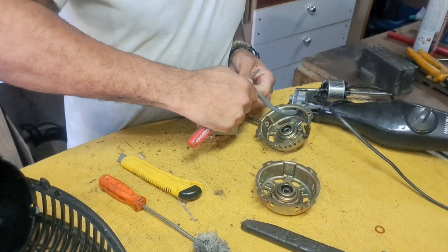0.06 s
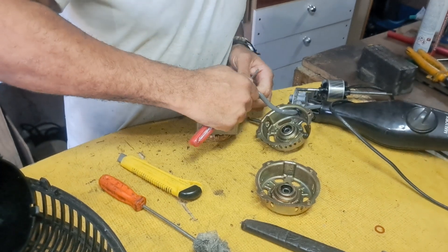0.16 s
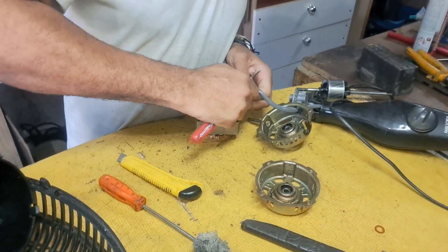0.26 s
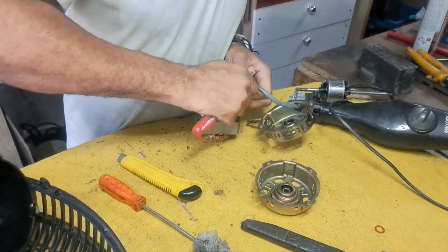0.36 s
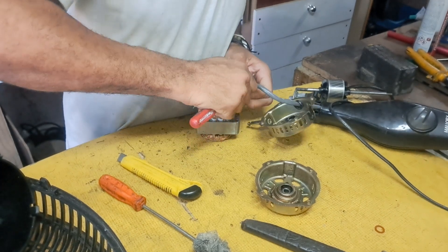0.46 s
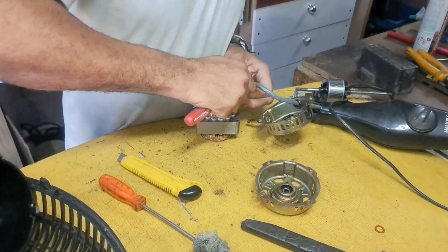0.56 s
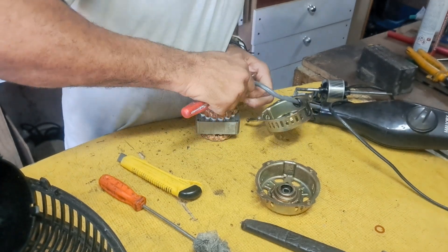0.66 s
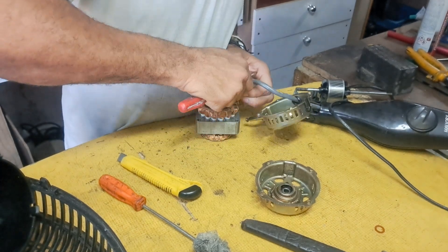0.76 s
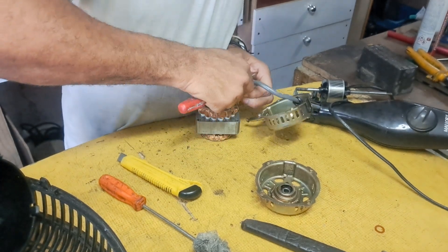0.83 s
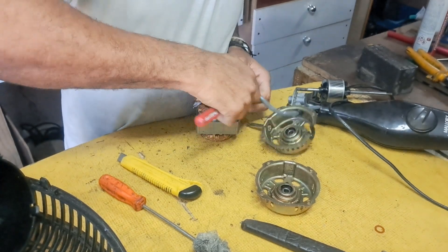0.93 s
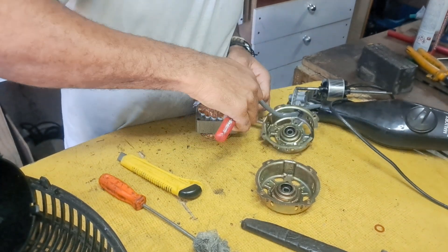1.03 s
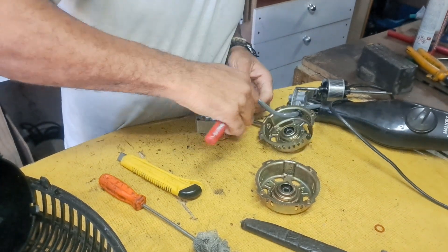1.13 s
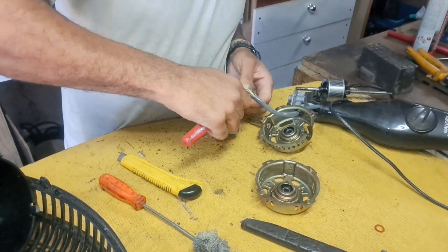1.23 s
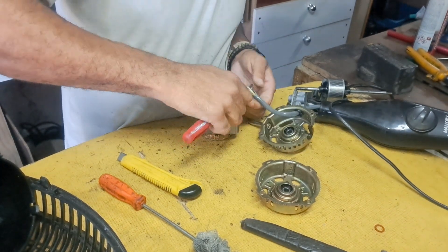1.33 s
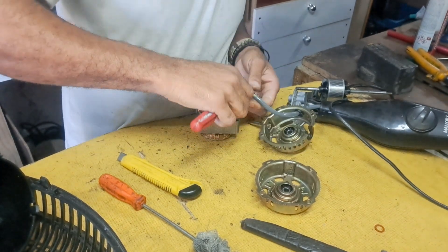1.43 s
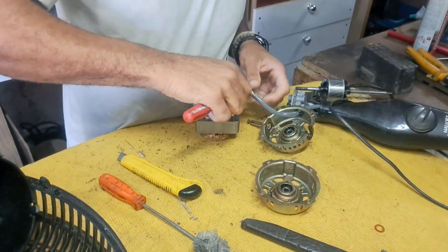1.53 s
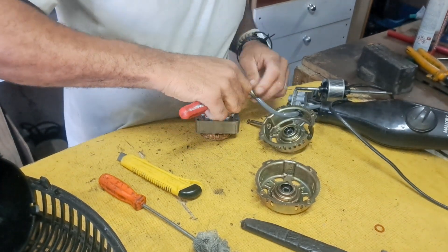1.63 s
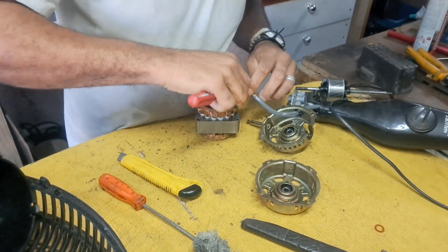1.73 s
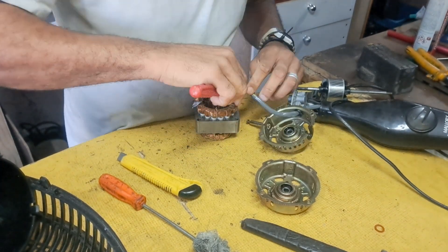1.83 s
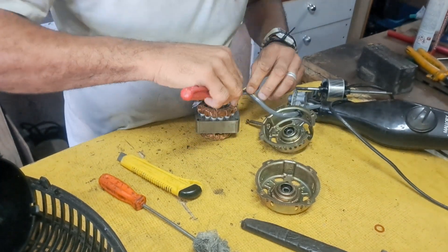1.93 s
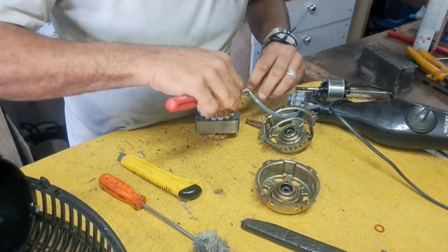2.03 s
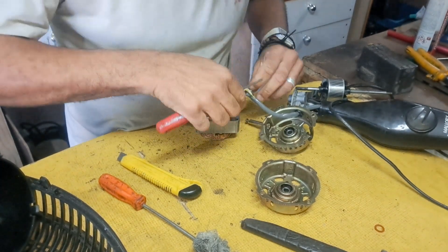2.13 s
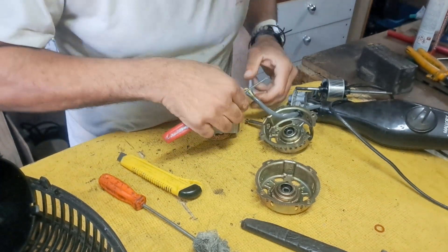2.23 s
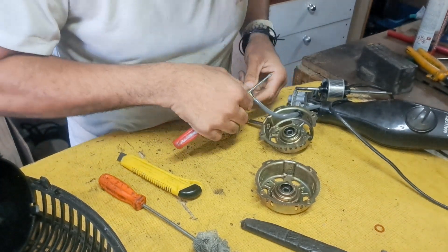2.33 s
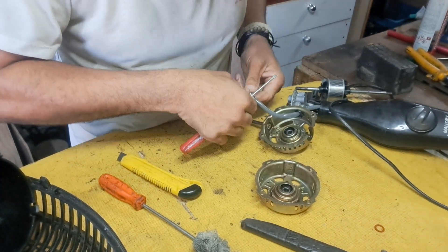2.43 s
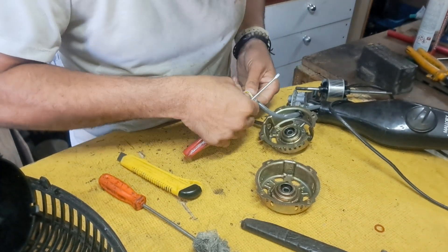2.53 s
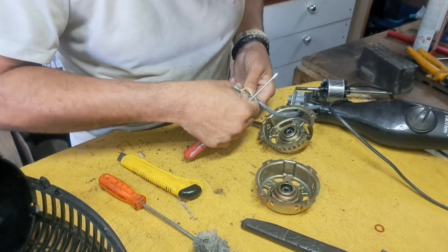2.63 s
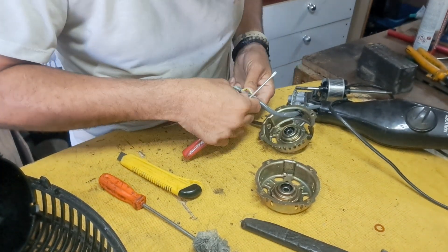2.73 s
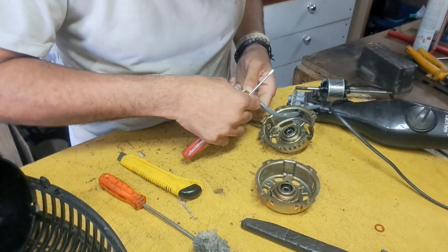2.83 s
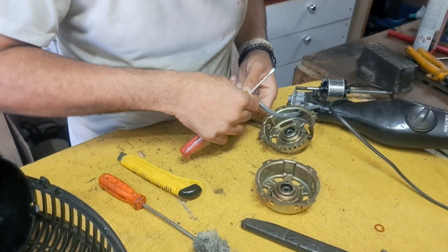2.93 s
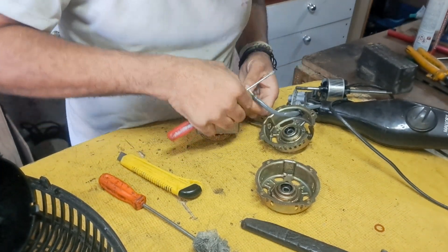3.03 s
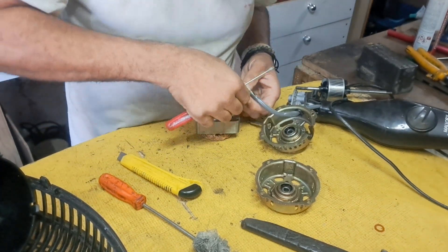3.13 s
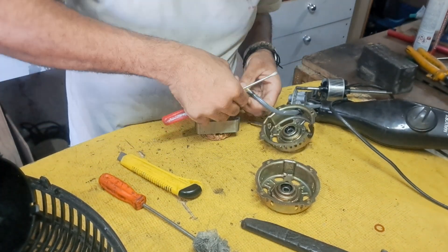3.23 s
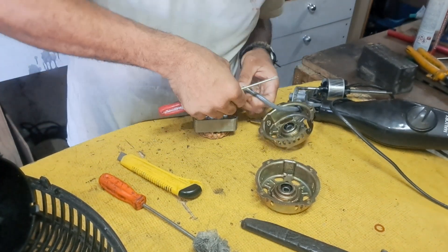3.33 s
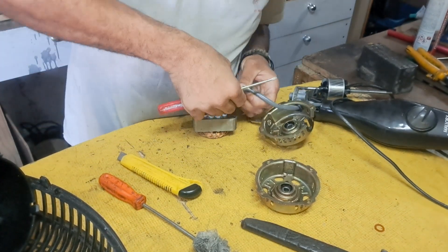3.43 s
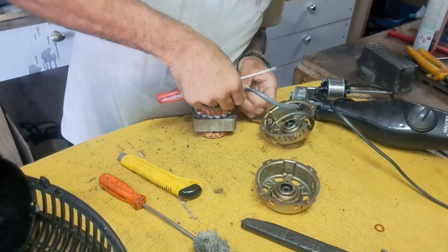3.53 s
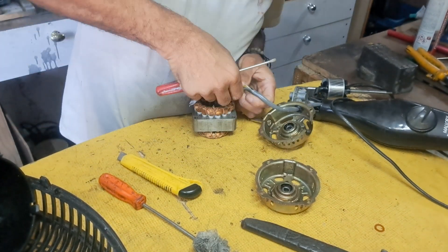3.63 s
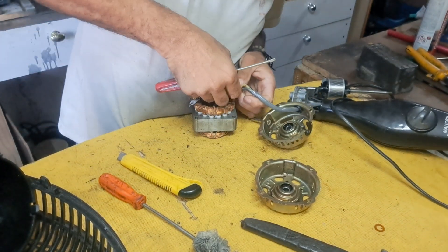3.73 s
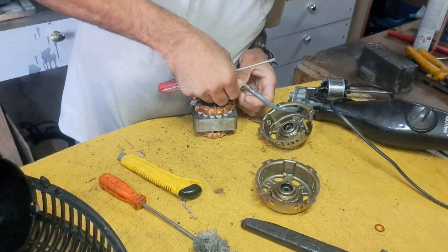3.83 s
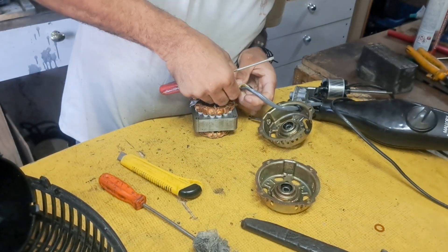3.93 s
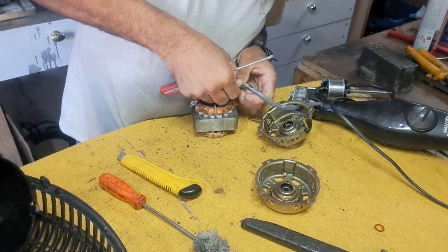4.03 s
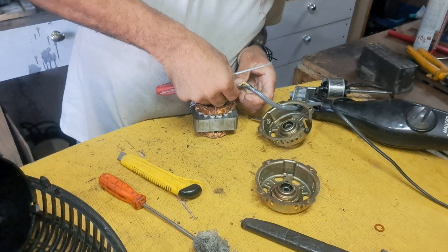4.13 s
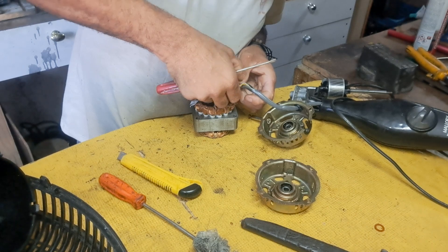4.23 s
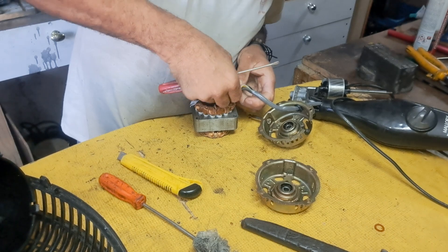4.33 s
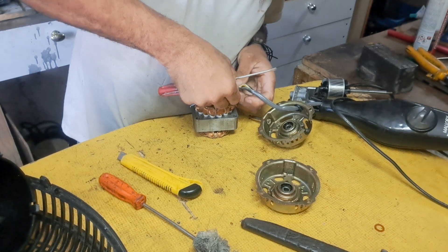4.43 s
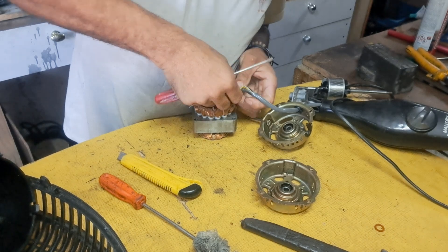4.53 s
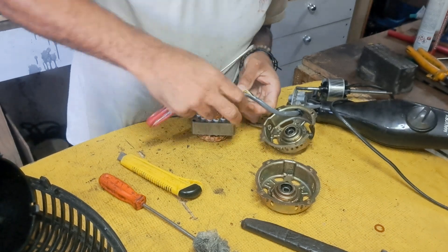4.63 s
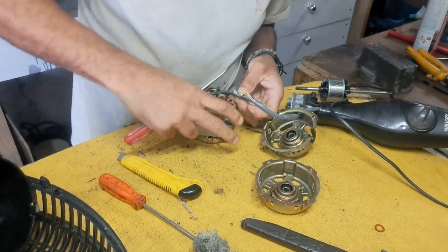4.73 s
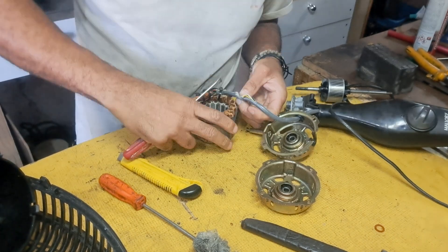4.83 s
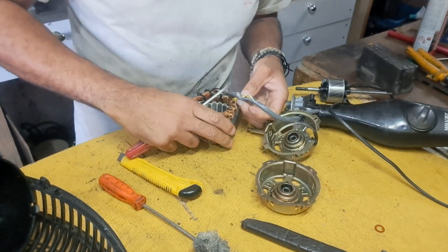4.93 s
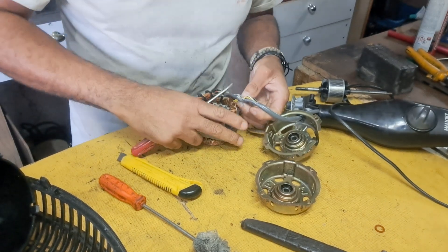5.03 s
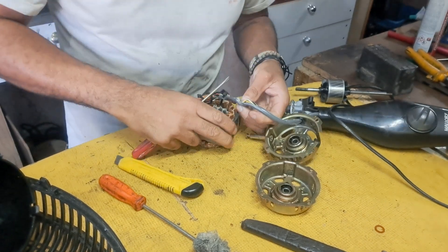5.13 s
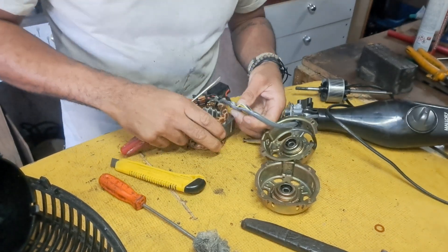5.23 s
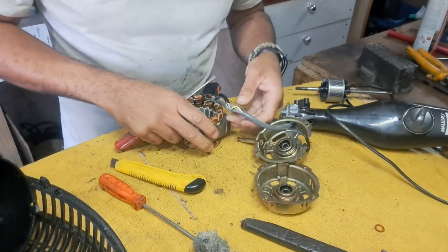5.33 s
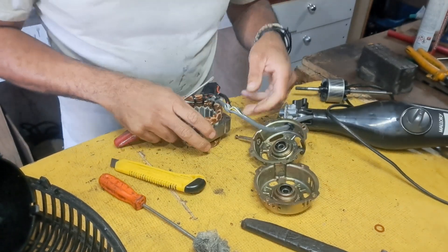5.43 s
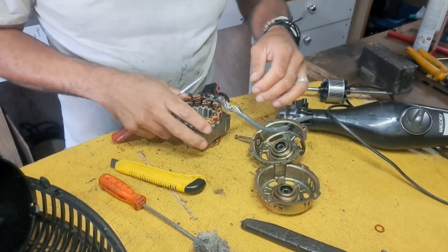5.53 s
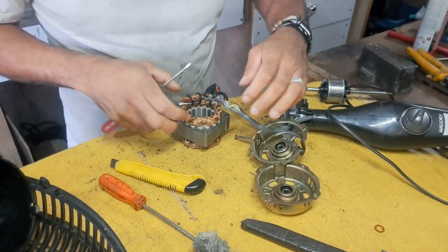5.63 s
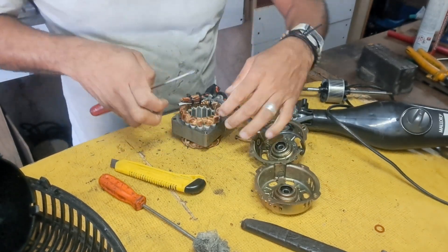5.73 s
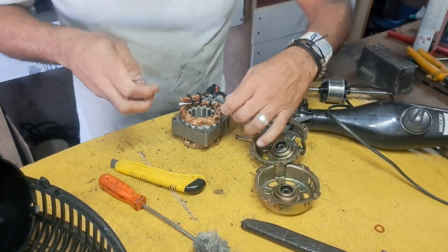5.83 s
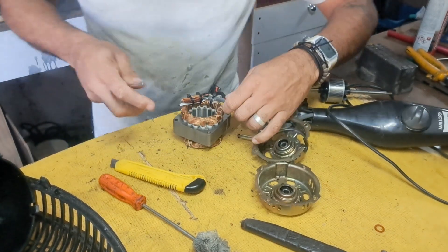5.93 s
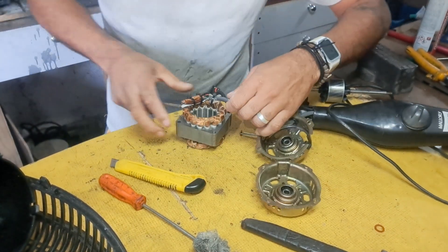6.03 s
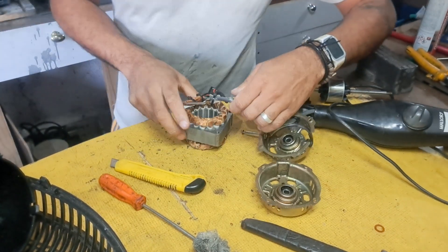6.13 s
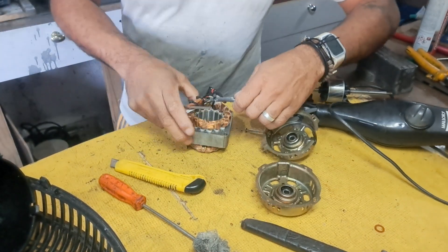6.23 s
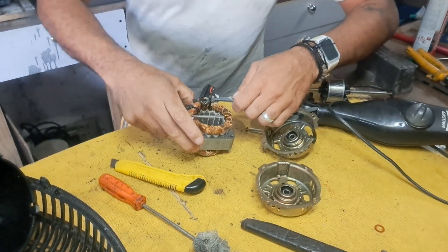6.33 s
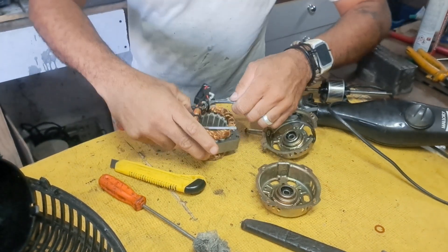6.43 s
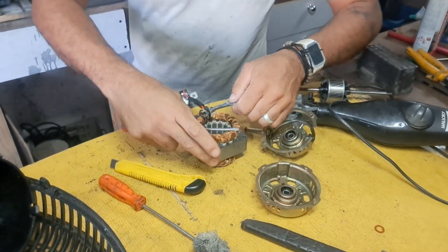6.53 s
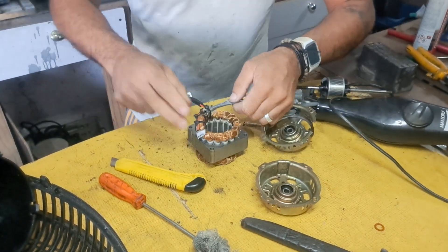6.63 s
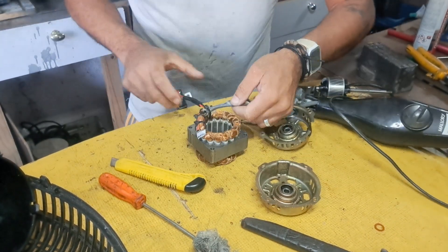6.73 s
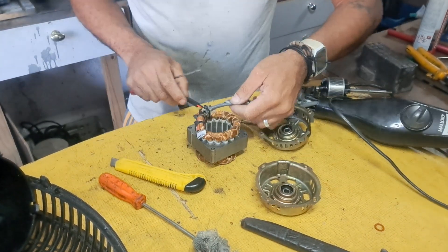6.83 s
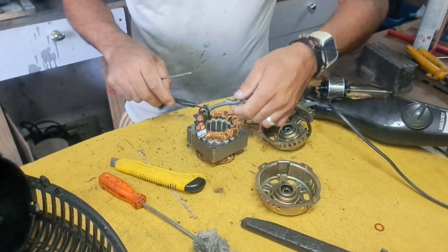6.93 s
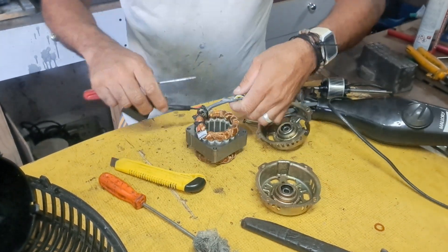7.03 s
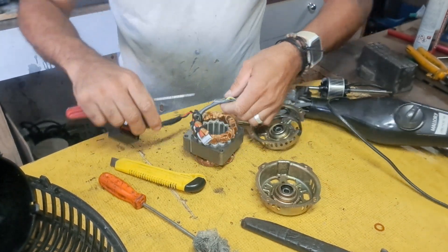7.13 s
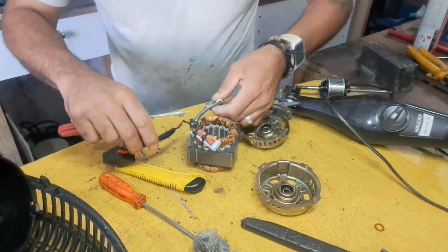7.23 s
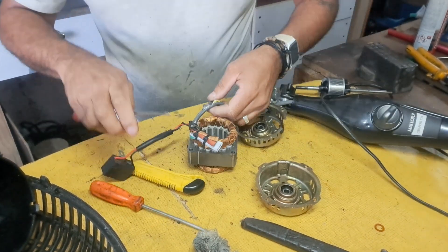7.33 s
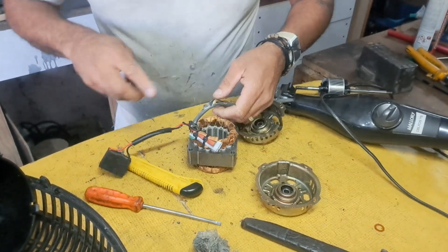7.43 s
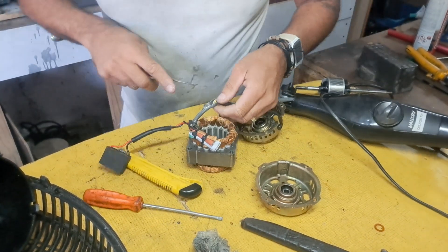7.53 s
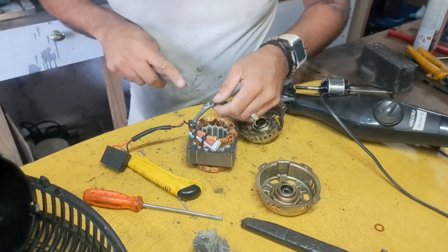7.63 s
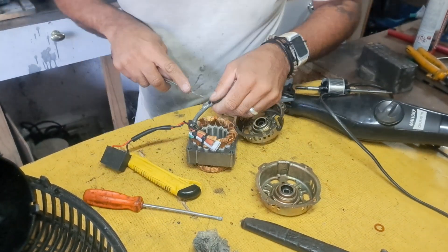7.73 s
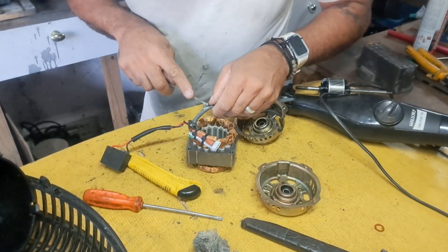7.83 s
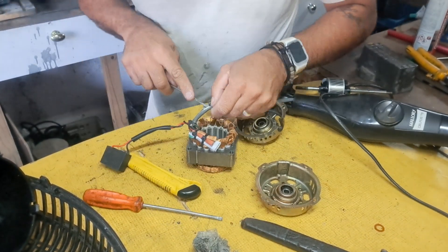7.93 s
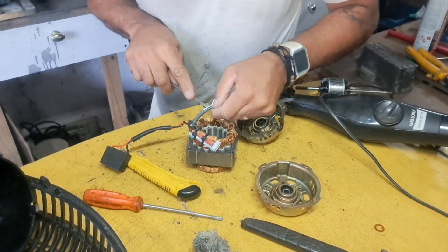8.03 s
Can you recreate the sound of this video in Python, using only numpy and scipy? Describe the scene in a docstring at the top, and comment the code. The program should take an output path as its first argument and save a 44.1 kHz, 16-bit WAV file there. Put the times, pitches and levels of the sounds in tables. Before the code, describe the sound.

Quiet bench work: one hard iron knock, soft bumps, then a busy run of scrapes, jingling steel, woody knocks and rustling wires.

```python
"""Small motor taken apart on a workbench

A heavy iron stator knocks on the board: noisy blows excite resonances of iron and wood.
Filtered ticks make the clinking steel, decaying sines the ringing end cap, shaped noise the scrape.
Hands and wires rub as noise mixed with a stream of tiny slips, and a faint whistle climbs in pitch.
Behind them are wavering sine tones for hum and whine, and a noise bed heard at a slowly changing level.
"""
import sys
import numpy as np
from scipy import signal
from scipy.fft import rfft, irfft, next_fast_len
from scipy.io import wavfile
from scipy.ndimage import uniform_filter1d, map_coordinates

SR = 44100
rng = np.random.default_rng(int(sys.argv[2]) if len(sys.argv) > 2 else 0)


def store_pcm(level_fs):
    """Save levels as 16-bit WAV."""
    pcm = np.round(np.clip(level_fs, -1, 1) * 32767).astype(np.int16)
    wavfile.write(sys.argv[1], SR, np.atleast_2d(pcm).T)


N = 355887
LENGTH = SR // 2  # samples that one blow lasts
T = np.arange(LENGTH) / SR  # time since the blow (s)


def amp(db):
    """Decibels to gain."""
    return 10 ** (np.asarray(db) / 20)


def unit(x):
    """x at rms 1."""
    return x / np.sqrt(np.mean(x ** 2) + 1e-20)


def along(points, hz):
    """(Hz, value) points read on a log frequency axis."""
    point_hz, values = np.transpose(points)
    return np.interp(np.log(hz + 1), np.log(point_hz + 1), values)


def curves(rows):
    """One value per sample for each column after the time."""
    times, *columns = np.transpose(rows)
    return [np.interp(np.arange(N) / SR, times, column) for column in columns]


def wobble(rate):
    """A smooth random curve with rate knots a second."""
    knots = rng.standard_normal(int(N * rate / SR) + 4)
    return map_coordinates(knots, [np.arange(N) * rate / SR])


def filtered(x, response):
    """x shaped by a response of frequency, which may be complex."""
    n = x.shape[-1]
    padded = 2 * next_fast_len(n // 2 + 4096)
    spectrum = rfft(x, padded) * response(np.fft.rfftfreq(padded, 1 / SR))
    return irfft(spectrum, padded)[..., :n]


def causal(db):
    """The minimum-phase response with this gain: it never sounds before its cause."""
    cepstrum = irfft(np.log(amp(db) + 1e-6))
    half = len(cepstrum) // 2
    fold = np.r_[1, np.full(half - 1, 2), 1, np.zeros(half - 1)]
    return np.exp(rfft(cepstrum * fold))


def rolloff(hz, cut_hz):
    """A contact that takes time leaves out the treble."""
    return causal(-10 * np.log10(1 + (hz / cut_hz) ** 4))


def resonances(modes, hz):
    """Response of a body as a sum of band-pass modes with alternating sign."""
    total = 0
    for k, (center, width, db) in enumerate(modes):
        band = 1j * hz * width / (center * center - hz * hz + 1j * hz * width)
        total = total + (-1) ** k * amp(db) * band
    return total


def sized(shape, pitch_hz):
    """The modes of a piece of this shape that rings at this pitch."""
    return [(ratio * pitch_hz, width * pitch_hz, db) for ratio, width, db in shape]


def diffuse(n):
    """Noise from all sides: alike at both microphones in the bass, unrelated in the treble."""
    mic_gap, sound_speed = 0.22, 343  # m, m/s

    def spread(hz):
        alike = .95 * np.sinc(2 * hz * mic_gap / sound_speed)
        return np.sqrt([1 + alike, 1 - alike])

    mid, side = filtered(rng.standard_normal((2, n)), spread)
    return unit(np.array([mid + side, mid - side]))


def rush(spectrum):
    """Diffuse noise of rms 1 with this spectrum."""
    return unit(filtered(diffuse(N), lambda hz: amp(along(spectrum, hz))))


# How long the workshop rings. Each row: frequency in Hz, time to fall by 60 dB in seconds.
ROOM = [(80, 0.55), (300, 0.26), (800, 0.25), (2500, 0.28), (7000, 0.23), (15000, 0.18)]
NEAR_ECHO = .0039  # delay of the bounce off a surface close by (s)


def contact(settle, chatter_db, room_db, echo=0):
    """One push, the brief chatter that follows it, a close reflection and the workshop's answer."""
    chatter = diffuse(LENGTH) * amp(-60 * T / max(settle, .003))
    hz, t, bins = signal.stft(diffuse(LENGTH), SR, nperseg=256)
    decay = amp(-60 * t / along(ROOM, hz)[:, None])
    tail = signal.istft(bins * decay, SR, nperseg=256)[1][:, :LENGTH]
    direct = (T == 0) + amp(chatter_db) * unit(chatter) / np.sqrt(LENGTH)
    bounce = echo * np.roll(direct, round(NEAR_ECHO * SR), axis=1)
    return direct + bounce + amp(room_db) * unit(tail) / np.sqrt(LENGTH)


def add(track, s, sound, db, pan_db=0):
    """Lay a sound into the track; db is the rms of its first 30 ms, pan_db is left minus right."""
    head = sound[:, :SR * 3 // 100]
    gain = amp([[db + pan_db / 2], [db - pan_db / 2]]) / np.sqrt(np.mean(head ** 2))
    part = track[:, max(round(s * SR), 0):][:, :LENGTH]
    part += (sound * gain)[:, :part.shape[1]]


def tones(rows):
    """Steady sine lines whose pitch wavers a little."""
    total = 0
    for hz, db, waver_hz in rows:
        phase = 2 * np.pi * np.cumsum(hz + waver_hz * wobble(13)) / SR
        total = total + amp(db) * np.sqrt(2) * np.sin(phase)
    return total


# Heard level of the noise bed, which the faint resting rub follows too.
# Each row: time in seconds, level in dB.
BED_LEVEL = [(.3, -72.5), (1.05, -62), (1.65, -67), (2.5, -59.5), (3.25, -58), (5.4, -47), (8.07, -50.5)]
# Colours of the low rumble, the airy noise and the faint hiss.
# Each row: frequency in Hz, relative density in dB per Hz.
RUMBLE = [(13, -38), (22, -18), (53, 4), (87, -10), (108, 2.5), (119, -1), (133, 4.5), (150, -12.5),
          (188, -14.5), (322, -11.5), (391, -17.5), (437, -13.5), (530, -22.5), (600, -19.5), (780, -47),
          (1320, -120)]
AIR = [(150, -25.5), (250, -2), (388, -2.5), (436, 1), (655, -11.5), (798, -3), (1510, -12), (1990, -15.5),
       (2460, -24.5), (4000, -48), (5200, -63.5), (8800, -120)]
HISS = [(1500, -35), (2500, -15), (2900, -19), (4200, -21), (6600, -20), (7450, -12), (9000, -25),
        (10500, -28), (13700, -24), (14900, -16), (15600, -9), (16000, -14)]
# Lines of the low hum and the thin whine. Each row: pitch in Hz, level in dB, pitch waver in Hz.
# The whine is heard at a level that wavers randomly around its row.
HUM = [(118, -60.5, 2), (439, -76.5, 3)]
WHINE = [(15675, -75, .2), (15736, -67, 4)]
RUMBLE_DB, RUMBLE_GROWS = -46.5, 0.65  # rumble at the mean bed level; its dB per dB of bed level
WHINE_WAVER_DB = 3  # size of the random waver heard in the whine's level


def workshop():
    """Rumble, airy noise and a faint hiss share one level curve, under a hum and a thin electrical whine."""
    bed_db, = curves(BED_LEVEL)
    rumble_db = RUMBLE_DB + RUMBLE_GROWS * (bed_db - bed_db.mean()) + 1.4 * wobble(13)
    rumble = amp(rumble_db) * rush(RUMBLE)
    air = amp(bed_db - 0.5 + 0.31 * wobble(2.4)) * rush(AIR)
    hiss_db = -70.0 + np.minimum(0.49 * (bed_db + 60.0), 3)  # stops rising at the highest bed levels
    hiss = amp(hiss_db) * rush(HISS)
    whine = amp(WHINE_WAVER_DB * wobble(16)) * tones(WHINE)
    return rumble + air + hiss + tones(HUM) + whine


# The whistle's path. Each row: time in seconds, pitch in Hz, level in dB.
WHISTLE = [(1.8, 5630, -94), (1.87, 5900, -83), (2.05, 6400, -73), (2.13, 6540, -83), (2.3, 7000, -95)]


def whistle():
    """A faint, airy whistle climbs: a wavering sine made fuzzy by a random envelope on each side."""
    pitch_hz, level_db = curves(WHISTLE)
    fuzz = np.array([wobble(630), wobble(300)])
    phase = 2 * np.pi * np.cumsum(pitch_hz + 60 * wobble(40)) / SR
    sounding = level_db > level_db.min()
    return sounding * amp(level_db) * unit(fuzz * np.sin(phase))


STROKE_ATTACK_S, STROKE_RELEASE_S = .05, .1  # time constants of a stroke's rise and fall


def stroke(start, length):
    """A rub rises, holds and dies away."""
    t = np.arange(N) / SR - start
    rise = np.minimum(t, 0) / STROKE_ATTACK_S
    fall = np.maximum(t - length, 0) / STROKE_RELEASE_S
    return np.exp(rise - fall)


# A hand slides over the parts. Each row: start in seconds, length in seconds,
# drive in dB before the flutter and the added grain.
STROKES = [(0.03, 0.072, -67.5), (1.33, 0.045, -71.5), (2.795, .15, -76), (3.68, .05, -66),
           (4.2, 0.56, -66.5), (4.786, 0.037, -59), (5.0, 0.26, -58), (5.244, .25, -53.5),
           (5.704, 0.57, -56), (6.093, 0.11, -52), (6.372, 0.59, -59), (6.764, 0.029, -54.5),
           (7.184, .3, -50.5), (7.595, 0.53, -60)]
# Colour of the rubbing. Each row: frequency in Hz, relative density in dB per Hz.
RUB = [(1180, -38.5), (2000, -1.5), (2480, -0.5), (2840, -4.5), (6040, -7.5), (7610, -4), (9030, -12),
       (12500, -8.5), (14600, -6.5), (15500, -5)]
RESTING_RUB_DB = -18  # drive of fingers that only hold the parts, relative to the bed level


def hands():
    """Skin and wires rub over the parts in a dense stream of tiny slips."""
    bed_db, = curves(BED_LEVEL)
    power = amp(bed_db + RESTING_RUB_DB) ** 2
    for s, length, db in STROKES:
        power = power + (amp(db) * stroke(s, length)) ** 2
    slips = (rng.random(N) < 900 / SR) * rng.exponential(size=N)  # about 900 a second
    slip_sound = contact(settle=0.0087, chatter_db=11.5, room_db=1.5)
    grain = signal.fftconvolve(slips[None], slip_sound, axes=1)[:, :N]
    grain = unit(filtered(grain, lambda hz: amp(along(RUB, hz))))
    return np.sqrt(power) * amp(wobble(14)) * (rush(RUB) + grain / 2)


# Resonances of the iron stator, for scrapes and knocks.
# Each row: frequency in Hz, width in Hz, relative level in dB.
STATOR = [(540.2, 23, -3), (712.4, 81, -5), (866, 56, -2), (970, 140, -1.5), (1229, 100, -1),
          (1397, 27, -1.5), (1596, 63, -3), (1743, 41, -0.5), (1886, 43, 1), (2030, 100, -2.5),
          (2129, 14, -2), (2305, 97, -11)]
# The stator is shifted. Each row: time in seconds, level in dB.
DRAG = [(5.0, -80), (5.1, -43), (5.16, -65.5), (5.2, -43), (5.3, -47), (5.42, -53), (5.56, -48), (5.7, -70)]


def drag():
    """Iron scrapes unevenly over the gritty board and wakes its own modes."""
    level_db, = curves(DRAG)
    grit = diffuse(N) * amp(6.1 * wobble(45))
    scrape = filtered(grit, lambda hz: resonances(STATOR, hz) * rolloff(hz, cut_hz=930))
    moving = level_db > level_db.min()
    return moving * amp(level_db) * unit(scrape)


# The ring of an end cap. Each row: frequency in Hz, relative level in dB, time to fall by 60 dB in seconds.
STEEL = [(1345, -5, .2), (2910, -10, .25), (3990, -6, .25), (4153, -1, .24), (5050, -9, .22),
         (5485, -8, .24), (5990, -8, .28), (7480, -9, .28), (8600, -13, .2), (12760, -13, .12)]
# The screwdriver skitters over an end cap. Each row: start in seconds, ring level in dB.
JINGLES = [(5.249, -44), (5.268, -52), (5.289, -46), (5.395, -59), (5.475, -56), (5.51, -58)]


def end_cap():
    """The cap's decaying modes ring unevenly while the blade chatters against it."""
    out = np.zeros((2, N))
    mode_hz, mode_db, t60 = np.transpose(STEEL)[:, :, None]
    for s, db in JINGLES:
        flutter = unit(uniform_filter1d(rng.standard_normal((len(STEEL), LENGTH)), size=300))
        envelope = amp(mode_db - 60 * T / t60 + 3 * flutter)
        modes = envelope * np.sin(2 * np.pi * mode_hz * T + flutter / 2)
        balance = amp(2 * rng.standard_normal((2, len(STEEL))))  # each mode's gain left and right
        add(out, s, balance @ modes, db)
    return out


FIDGET_SPAN, FIDGET_COUNT = (5.0, 7.7), 6  # first and last slot (s); number of chance contacts
FIDGET_DB, FIDGET_SCATTER_DB, FIDGET_HZ = -68, 10, 4130  # middle level, its spread, middle pitch


def fidgets():
    """Rows like those of CLINKS for tiny chance contacts, loosely spread over the handling."""
    rows = []
    for slot in np.linspace(*FIDGET_SPAN, num=FIDGET_COUNT):
        late, strong, high = rng.uniform(-1.1, 1, 3)
        level_db = FIDGET_DB + FIDGET_SCATTER_DB * strong
        rows.append((slot + 0.13 * late, level_db, FIDGET_HZ * 2 ** (high / 2), level_db))
    return rows


# Light steel contacts. Each row: start in seconds, clack level in dB, clack pitch in Hz, tick level in dB.
CLINKS = [(1.194, -64, 5260, -58.5), (1.325, -73, 5550, -73), (3.729, -59, 6700, -62),
          (4.158, -61, 2930, -57), (4.554, -66, 7460, -76), (4.947, -35.5, 2700, -35.5),
          (5.251, -48.5, 3970, -50), (5.269, -42.5, 1440, -48), (5.287, -42, 2370, -38),
          (5.476, -61, 2770, -58), (5.654, -56, 5400, -69), (5.714, -52, 1310, -81),
          (7.3, -39.5, 4500, -34.5), (7.315, -43.5, 2390, -39), (7.364, -34.5, 2620, -41),
          (7.365, -40, 7270, -30.5), (7.421, -46, 2480, -41.5), (7.526, -53, 4830, -56.5),
          (7.615, -52, 2220, -52.5), (7.663, -52.5, 2210, -50)]
# Modes of a small steel part.
# Each row: ratio to its pitch, width as a share of its pitch, relative level in dB.
PART = [(.4, .14, -1.5), (.66, .1, -7.5), (.81, .08, 1.5), (.92, 0.12, 2.5), (1.02, 0.065, 8.5),
        (1.33, 0.062, 2.5), (1.48, 0.07, -4), (1.65, 0.053, 0)]
# Colour of the bright tick. Each row: frequency in Hz, relative density in dB per Hz.
TICK = [(1000, -30), (3000, -5), (4200, 1), (5500, -1), (6500, -4), (7600, 1), (9000, -6), (11000, -4),
        (13000, -4), (14500, -9), (16000, -14)]


def clinks():
    """Steel on steel: a bright tick and the short clack of the part that is hit."""
    out = np.zeros((2, N))
    ripple_hz = np.linspace(0, SR / 2, num=70)
    for s, clack_db, pitch_hz, tick_db in CLINKS + fidgets():
        touch = contact(settle=0.02, chatter_db=17, room_db=13.5, echo=0.45)
        # each point of contact wakes other high modes
        ripple_db = 3 * rng.standard_normal(len(ripple_hz))
        tick = filtered(touch, lambda hz: causal(along(TICK, hz) + np.interp(hz, ripple_hz, ripple_db)))
        clack = filtered(touch, lambda hz: resonances(sized(PART, pitch_hz), hz))
        add(out, s, clack, clack_db, pan_db=-10.0)
        add(out, s, tick, tick_db)
    return out


# Weight lands softly on the board. Each row: start in seconds, level in dB, pitch in Hz.
THUDS = [(0.002, -38, 149), (0.161, -43, 159), (1.157, -41.5, 338), (1.201, -42, 340), (2.736, -43.5, 188),
         (3.721, -30, 428), (4.209, -39.5, 124), (4.25, -44, 320), (4.648, -41, 160.5), (5.199, -33, 129.5),
         (5.246, -30, 247), (5.291, -34, 151), (5.39, -38.5, 294), (5.56, -38.5, 312), (5.711, -43, 422),
         (6.317, -37, 363), (6.575, -28.5, 80), (6.606, -25, 270), (6.618, -24, 115), (6.651, -36, 59),
         (7.18, -39, 120), (7.28, -35, 221), (7.3, -31, 99), (7.371, -31, 370), (7.53, -37, 61.6)]
# Resonances of the board. Each row: frequency in Hz, width in Hz, relative level in dB.
BOARD = [(58, 20, 4.5), (126.7, 12, 10), (164.8, 10.3, 4), (245.1, 39, -3), (332, 51, 0.5), (403, 47, -6.5),
         (446.2, 39, -3), (575, 40, -16), (688, 40, -7.5)]
KNOCK_THUD_HZ = 418  # the hard edge always wakes the same part of the board's range
SETTLE_CYCLES = 11  # a soft, low landing takes longer to settle
THUD_WIDTH = 0.55  # share of the push's left-right difference that the boom keeps


def thuds():
    """The board booms: a softer contact wakes lower modes and takes longer to settle."""
    out = np.zeros((2, N))
    under_knocks = [(s, thud_db, KNOCK_THUD_HZ) for s, *_, thud_db in KNOCKS]
    for s, db, pitch_hz in THUDS + under_knocks:
        push = contact(SETTLE_CYCLES / pitch_hz, chatter_db=-4.0, room_db=-6.5)
        push = THUD_WIDTH * push + (1 - THUD_WIDTH) * push.mean(axis=0)

        def boom(hz):
            octaves = np.log2((hz + 1) / pitch_hz)
            return resonances(BOARD, hz) * causal(-5 * np.minimum(octaves ** 2, 8))

        add(out, s, filtered(push, boom), db)
    return out


# The stator's hard edge meets the board. Each row: start in seconds, knock level in dB,
# corner pitch in Hz, crack cut-off in Hz, level in dB of the thud under it.
KNOCKS = [(0.0, -53.5, 2060, 3050, -53.5), (0.987, -29.5, 2060, 12200, -35.5),
          (1.017, -17.5, 2760, 15000, -17.5), (2.681, -52.5, 1140, 14000, -49),
          (6.059, -45.5, 2630, 5500, -47), (6.082, -37, 2080, 5470, -44.5), (6.239, -44, 1850, 6000, -40.5),
          (6.486, -28, 1980, 4600, -31.5), (6.528, -25, 2390, 4800, -33), (6.598, -36, 1140, 3000, -34.5),
          (6.908, -32, 2760, 3460, -39), (7.343, -35.5, 3100, 4570, -25)]
# Modes of the corner that lands.
# Each row: ratio to its pitch, width as a share of its pitch, relative level in dB.
CORNER = [(.86, 0.13, -2.5), (1.02, 0.069, 1)]
# Colour of the crack. Each row: frequency in Hz, relative density in dB per Hz.
CRACK = [(1000, -19), (3000, -1), (3900, 1), (4700, -2), (5500, 0), (6500, -5.5), (7700, 0.5), (9500, -7.5),
         (13000, -3), (15500, -6.5)]
CORNER_DB = -7  # the corner's clack, relative to the knock
CRACK_DB, CRACK_GROWS = -21.5, 0.81  # the crack of a 0 dB knock; its dB per dB of knock
KNOCK_PAN_DB = -7  # left minus right: the stator lies to the right


def knocks():
    """Iron on the board: a hard crack, the clack of the corner and a short, woody ring."""
    out = np.zeros((2, N))
    for s, knock_db, pitch_hz, cut_hz, _ in KNOCKS:
        blow = contact(settle=0.014, chatter_db=9, room_db=6.0, echo=0.49)
        snap = contact(settle=0.019, chatter_db=-1.0, room_db=3.5, echo=0.2)
        stop = contact(settle=.008, chatter_db=-3, room_db=-11, echo=.2)  # the corner is stopped dead
        ring = filtered(blow, lambda hz: resonances(STATOR, hz) * rolloff(hz, cut_hz=2100))
        clack = filtered(stop, lambda hz: resonances(sized(CORNER, pitch_hz), hz) * rolloff(hz, pitch_hz))
        crack = filtered(snap, lambda hz: causal(along(CRACK, hz)) * rolloff(hz, cut_hz))
        add(out, s, ring, knock_db, KNOCK_PAN_DB)
        add(out, s, clack, knock_db + CORNER_DB, KNOCK_PAN_DB)
        add(out, s, crack, CRACK_DB + CRACK_GROWS * knock_db, KNOCK_PAN_DB)
    return out


def scene():
    """Everything on and around the bench, from the background to the knocks."""
    background = workshop() + whistle()
    handling = hands() + drag() + end_cap() + clinks()
    return background + handling + thuds() + knocks()


TOP_HZ = 15900  # upper band limit


def record(dry):
    """The recorder clips at full scale, then cuts steeply above its band limit."""
    return filtered(np.clip(dry, -1, 1), lambda hz: 1 / np.sqrt(1 + (hz / TOP_HZ) ** 400))


dry = scene()
out = record(dry)
store_pcm(out)
```